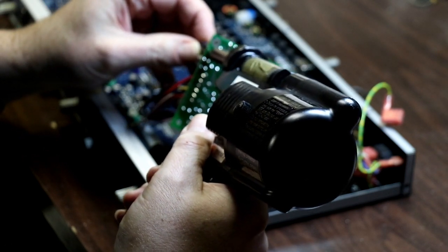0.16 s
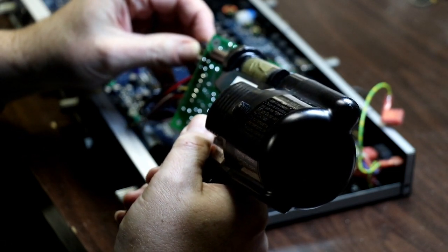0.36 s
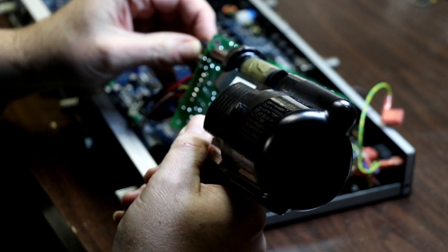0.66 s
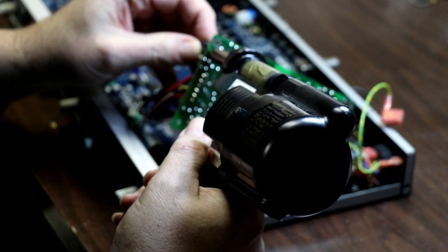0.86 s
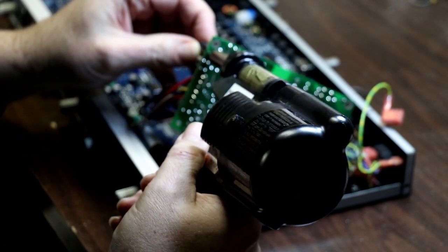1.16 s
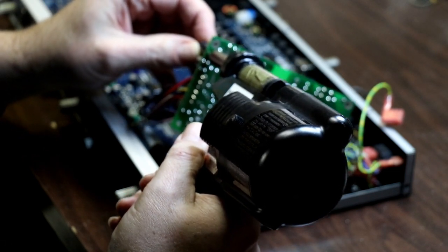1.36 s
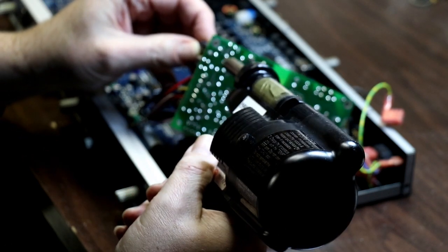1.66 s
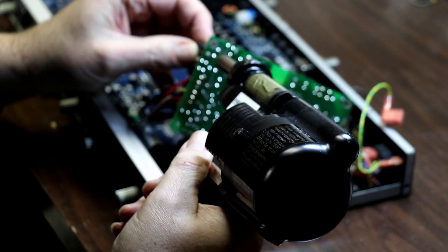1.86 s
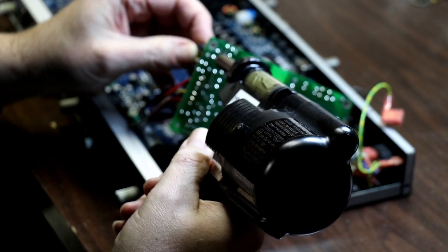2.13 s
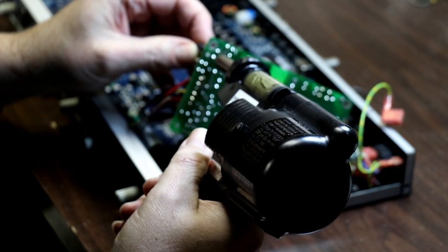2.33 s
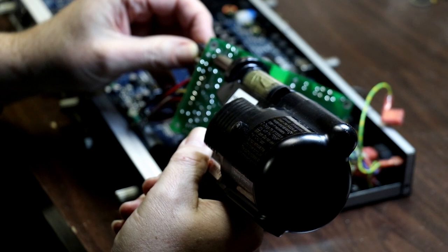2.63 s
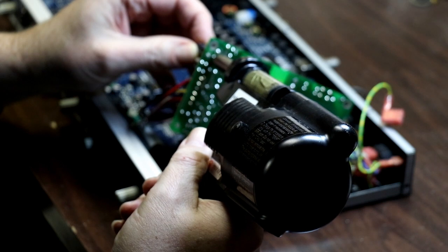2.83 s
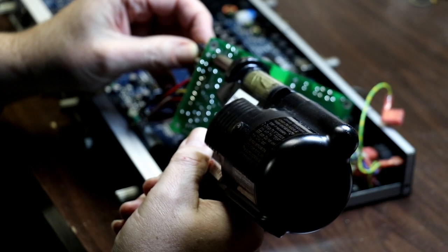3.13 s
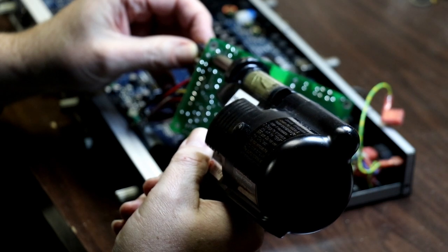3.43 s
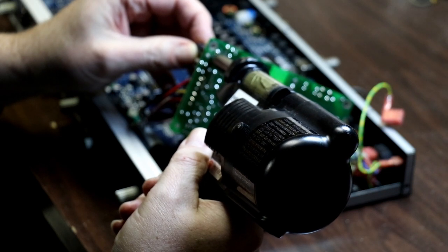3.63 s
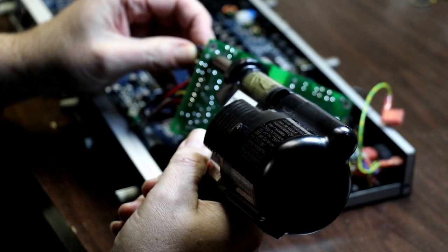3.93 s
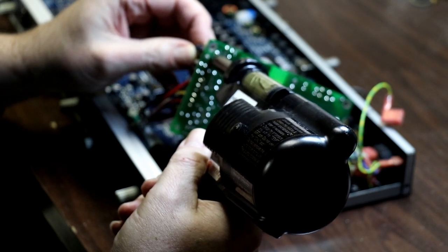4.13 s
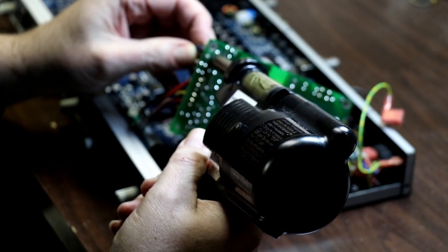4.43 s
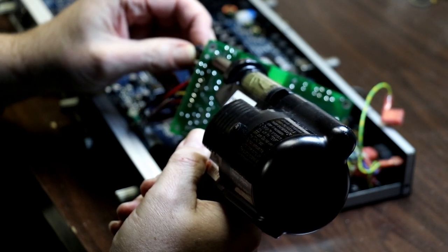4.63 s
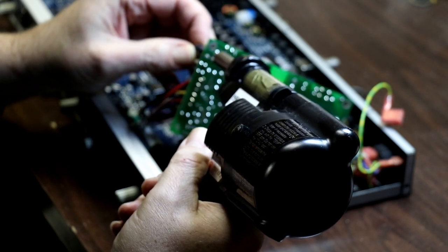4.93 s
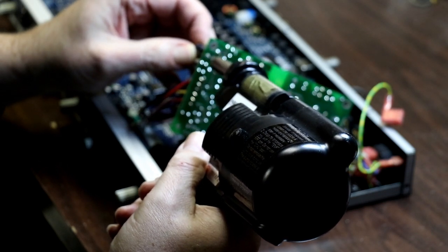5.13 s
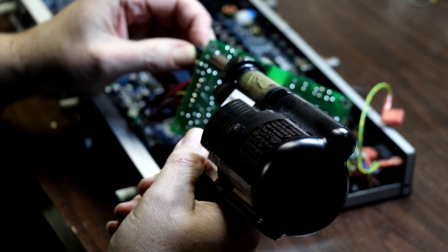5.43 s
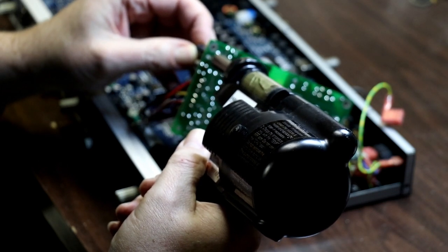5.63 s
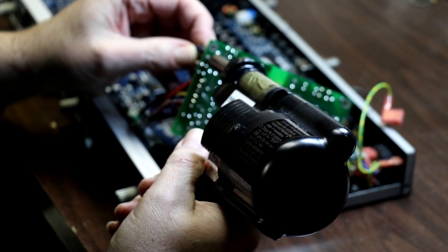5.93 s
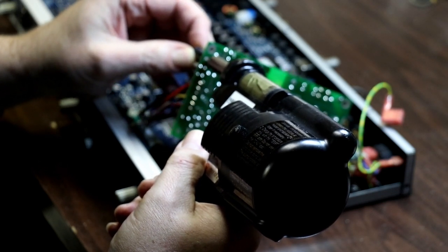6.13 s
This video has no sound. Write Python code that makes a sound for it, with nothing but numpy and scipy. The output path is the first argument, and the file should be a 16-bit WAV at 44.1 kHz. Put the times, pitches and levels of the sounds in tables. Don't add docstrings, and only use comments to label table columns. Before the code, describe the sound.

A small, dry room with a low, soft fan drone and faint hiss throughout, heard in close stereo at a workbench. At about 0.3 s a trigger clicks with a sharp tap and a desoldering gun's motor leaps to speed within a tenth of a second. Its pump makes a loud, coarse, low buzz, roughly a hundred knocks a second, with hard plastic housing resonance, a rattle strongest at the start and bright hissing air in the nozzle. The pitch stays almost steady until 1.5 s, when it drops and dies rapidly. From 1.6 to 3.6 s only the fan is left, with sparse faint ticks of board and tip, one clearer near 2.6 s. At 3.7 s click and tap launch a second buzz, gaining a stronger ringing tone as it runs. It stops at 4.9 s. The fan hum continues to the end around 6.3 s, dipping briefly near 5, 5.9 and 6.1 s.

```python
import sys
import numpy as np
from scipy import signal
from scipy.fft import rfft, irfft, next_fast_len
from scipy.io import wavfile

SR = 44100
rng = np.random.default_rng(int(sys.argv[2]) if len(sys.argv) > 2 else 0)


def int16_out(signal):
    q = np.round(np.clip(np.atleast_2d(signal).T, -1, 1) * 32767)
    wavfile.write(sys.argv[1], SR, q.astype(np.int16))


def voltage_ratio(level):
    return 10 ** (np.asarray(level, float) / 20)


N = 277080
t = np.arange(N) / SR


def rms_one(x):
    return x / np.sqrt(np.mean(x ** 2) + 1e-20)


def at_hz(points, hz, column=1):
    points = np.array(points, float)
    return np.interp(np.log(np.maximum(hz, 1)), np.log(points[:, 0]), points[:, column])


def drift(rate):
    knots = rng.standard_normal(int(N / SR * rate) + 3)
    return np.interp(t * rate, np.arange(len(knots)), knots)


def causal(x, db, size=8192):
    cepstrum = irfft(db * np.log(10) / 20, size)
    cepstrum[1:size // 2] *= 2
    cepstrum[size // 2 + 1:] = 0
    response = irfft(np.exp(rfft(cepstrum)), size)
    return signal.oaconvolve(x, response)[:N]


def resonate(x, hz, width_hz):
    r = np.exp(-np.pi * width_hz / SR)
    zeros = np.array([1, 0, -1]) * (1 - r * r) / 2
    poles = [1, -2 * r * np.cos(2 * np.pi * hz / SR), r * r]
    return signal.lfilter(zeros, poles, x + 1e-18)


def noise(spectrum, likeness):
    size = next_fast_len(N)
    hz = np.arange(size // 2 + 1) * SR / size
    mid, side = rfft(rng.standard_normal((2, size))) * voltage_ratio(at_hz(spectrum, hz))
    alike = np.clip(at_hz(likeness, hz), -1, 1)
    both = np.sqrt(1 + alike) * mid + np.sqrt(1 - alike) * side * [[1], [-1]]
    return rms_one(irfft(both, size)[:, :N])


# time in seconds, depth in dB, half length in seconds.
LULLS = [
    (2.31, -14, 0.027),
    (3.102, -8, .15),
    (5.0, -7, 0.089),
    (5.948, -19, .05),
    (6.095, -13, 0.038),
]
# pitch in Hz, width in Hz, level in dB.
FAN = [(46.6, 1.4, -70), (125, 9.5, -56.5), (194, 15, -51), (231, 3.4, -70), (260, 2.1, -57.5),
       (382, 2.9, -61), (387.7, 12, -56.5), (638, 1.6, -65.5)]
# frequency in Hz, level in dB per Hz.
RUMBLE = [(25, -30), (45, -6), (108, -16), (118, 2), (195, 1), (210, -19), (340, -5), (390, -10),
          (500, -12), (1000, -17.5), (1270, -14.5), (1600, -20), (2500, -26), (3500, -38)]
# frequency in Hz, level in dB per Hz.
SELF_NOISE = [(1470, -24), (2500, -6.5), (3160, -1.5), (4100, -5.5), (4880, -16.5), (5950, -3), (7030, -3),
              (7650, -2.5), (9110, -3.5), (11400, -6.5), (15400, -26)]
# frequency in Hz, left-right likeness (-1 to 1).
ROOM_ALIKE = [(60, 0.89), (130, 0.99), (290, 0.94), (640, 0.63), (1410, 0.36), (3100, -0.04), (6820, -0.01),
              (15000, 0.03)]
BLADE_HZ, BLADE_DB = 192.8, -44.5
RUMBLE_DB, SELF_NOISE_DB = -47.0, -62.5
ROOM_LAG = 5


def room_tone():
    swell = voltage_ratio(sum(db * np.exp(-((t - s) / half_s) ** 2) for s, db, half_s in LULLS))
    blade = np.sqrt(2) * np.sin(2 * np.pi * BLADE_HZ * t + .5 * drift(4.28))
    blade = blade * voltage_ratio(BLADE_DB + 2.0 * drift(5.57))
    tones = sum(voltage_ratio(db) * rms_one(resonate(rng.standard_normal(N), hz, width)) for hz, width, db in FAN)
    rumble = noise(RUMBLE, ROOM_ALIKE)
    rumble[0] = np.roll(rumble[0], ROOM_LAG)
    hiss = noise(SELF_NOISE, ROOM_ALIKE)
    return swell * blade + tones + voltage_ratio(RUMBLE_DB) * rumble + voltage_ratio(SELF_NOISE_DB) * hiss


def room(x, t60_s=0.12):
    age = t[:SR // 2]
    tail = rng.standard_normal((2, len(age))) * voltage_ratio(-60 * age / t60_s) * (age > .004)
    tail = signal.lfilter([.5], [1, -.5], tail)
    tail = tail / np.sqrt(np.sum(tail ** 2) / 2)
    return signal.oaconvolve(x[None], tail, axes=1)[:, :N]


# start in seconds, peak in dB, pitch in Hz.
TICKS = [(1.617, -50.5, 5300), (1.858, -50, 1300), (2.302, -50, 1300), (2.499, -51, 1300),
         (2.562, -41.5, 1200), (3.298, -48, 1900), (3.49, -50, 1300), (3.553, -51, 1300), (3.686, -40, 800),
         (3.69, -38, 2700), (.301, -26, 1500), (3.711, -23, 1500)]


def ticks():
    out = np.zeros(N)
    age = t[:800]
    for s, db, hz in TICKS:
        i = round(s * SR)
        jitter = np.sqrt(hz) / 240 * rng.standard_normal(800).cumsum()
        ring = np.sin(2 * np.pi * hz * age + jitter)
        out[i:i + 800] += voltage_ratio(db + 4) * ring * np.exp(-7 * np.sqrt(hz) * age)
    return out


# start in seconds, peak in dB.
TRIGGER = [
    (0.274, -41),
    (3.682, -41),
]
# (2 / time, in Hz, is
# added to a width of 1000 Hz).
TRIGGER_MODES = [(3400, 0, 0.027), (5660, -8, .02), (6600, -3.5, .03), (8200, -15, .02), (12100, -13, .015)]


def trigger_clicks():
    out = np.zeros(N)
    for s, db in TRIGGER:
        crackle = rng.standard_normal(N) * (t > s) * np.exp(-np.maximum(t - s, 0) / 0.0028)
        modes = sum(voltage_ratio(g) * resonate(crackle, hz, 2.0 / t60 + 1000) for hz, g, t60 in TRIGGER_MODES)
        out += voltage_ratio(db + 22) * modes
    return out


# frequency in Hz, level in dB per Hz.
AIR = [(1940, -3), (3300, 1), (3590, -10.5), (4370, -6), (4610, -3), (5390, -0.5), (6270, 0), (6970, -1.5),
       (7630, 2), (8650, -5), (9600, -1.5), (11500, -7.5), (13100, -15.5), (14500, -11.5), (15800, -26)]
# pitch in Hz, width in Hz, level in dB.
WHISTLES = [(4330, 60, -27.5), (5600, 50, -19), (7470, 79, -37.5), (9370, 48, -17), (10020, 140, -15)]
# frequency in Hz, left-right likeness.
GUN_ALIKE = [(300, .97), (2000, .85), (4400, .8), (8100, .72), (15000, .45)]
BENCH_ECHO = 11


def air(angle):
    hiss = noise(AIR, GUN_ALIKE)
    whistles = sum(voltage_ratio(db + 4.0 * drift(4.68)) * rms_one(resonate(hiss, hz, width))
                   for hz, width, db in WHISTLES)
    spit = .3 * np.exp(60.0 * (np.cos(angle) - 1))
    stroke = 1 + .17 * np.cos(angle - 2.6) + spit
    hiss = rms_one((hiss + whistles) * stroke * voltage_ratio(0.4 * drift(25.03)))
    hiss[0] = .8 * hiss[0] + .45 * np.roll(hiss[0], BENCH_ECHO)
    return hiss * voltage_ratio([[-1.5], [1.5]])


# pitch in
# Hz, width in Hz, level in dB.
SWEPT = [(440, 18, 5), (545, 18, 0), (645, 18, 4), (840, 22, 11), (935, 18, 8), (1235, 20, 7),
         (1325, 20, 6), (1580, 30, 3), (1830, 20, 6), (1920, 20, 6), (2410, 60, 3), (2900, 25, 3)]
# frequency in Hz, level in dB per Hz.
RATTLE = [(60, -24), (150, -3), (400, -1), (700, 4.5), (1000, -9.5), (1300, 2.5), (1600, 0.5), (2000, 2.5),
          (2500, -7.5), (3100, 0.5), (3600, -47), (5000, -19)]


def rattle(angle):
    shaken = noise(RATTLE, GUN_ALIKE) * (1 + .5 * np.cos(angle - .6))
    return shaken + sum(voltage_ratio(db + 10.5) * resonate(shaken, hz, 4 * width) for hz, width, db in SWEPT)


# pitch in Hz, width in Hz, level in dB.
CAGE_MODES = [(913, 120, -9), (1305, 50, 3), (1696, 30, -6), (1915, 190, -9), (2315, 450, -15)]
CAGE_SHARE = 0.19


def cage(angle, lower_db=-8):
    comb = sum(np.exp(1j * k * angle) for k in range(4, 30))
    beat = np.exp(1j * CAGE_SHARE * angle) + voltage_ratio(lower_db) * np.exp(-1j * CAGE_SHARE * angle)
    lines = (comb * beat).real
    return rms_one(sum(voltage_ratio(db) * resonate(lines, hz, width) for hz, width, db in CAGE_MODES))


# multiple of the turn rate, level in dB, left minus right in dB.
HOUSING = [(1, -16, 0), (2, -13, 0), (3, -13, 0), (4, -7, -2), (5, -6, 0), (6, -8, -2), (7, -.5, 5),
           (8, -8, 1), (9, -13, -5), (10, -12, -4), (11, -13, -2), (12, -13.5, 0), (13, -9, -5),
           (14, -4, -1), (15, -21, 2), (16, -9, -4), (17, -20, -4), (18, -10, 0), (19, -17, -8),
           (20, -9, -8), (21, -7, 0), (22, -11, -5), (23, -21, -6), (24, -10, 3), (25, -12, -8),
           (26, -24, -8), (27, -25, -7), (28, -17, -1), (29, -17, -6), (30, -19, -1)]
# frequency in Hz, level in dB, left minus right in dB.
HOUSING_TOP = [(3170, -23.5, 3), (3140, -35, -17), (3460, -34, 13), (3690, -30, -18.5), (4116, -41, -7),
               (4240, -25, 4.5), (4740, -39.5, -21), (5460, -27.5, 6), (6000, -44, -9)]
FULL_HZ, SLEEVE_ORDER, SLOTS = 98.4, 13, 7


def knocks(speed, angle, sleeve_db, wander_db=1.0, slot_db=5.0):
    table = np.array(HOUSING, float) * [FULL_HZ, 1, 1]
    table[SLOTS - 1::SLOTS, 1] -= slot_db
    table = np.vstack([(40, -45, 0), table, HOUSING_TOP])
    turn = np.exp(1j * angle)
    spread = np.exp(1j * np.where(np.arange(61) < 16, 2.2, 1.5) * rng.standard_normal(61))
    force, power = 0, 1
    for k in range(1, 61):
        power = power * turn
        wander = wander_db * min(k / 14, 1.5) * np.array([drift(6.5), drift(4.68)])
        unbalance_db = 34.0 * np.log10(speed / FULL_HZ) * (k < 4)
        extra_db = slot_db * (k % SLOTS == 0) + sleeve_db * (k == SLEEVE_ORDER)
        force = force + (power * spread[k]).real * voltage_ratio(wander + unbalance_db + extra_db)
    hz = np.fft.rfftfreq(8192, 1 / SR)
    swept = sum(db * np.exp(-((hz - centre) / width) ** 2) for centre, width, db in SWEPT)
    level = at_hz(table, hz) + swept
    pan = at_hz(table, hz, column=2)
    return rms_one(np.array([causal(force[0], level + pan / 2), causal(force[1], level - pan / 2)]))


# motor start in seconds, switch opening in seconds, running speed in turns per s,
# creep in turns per s per s.
BURSTS = [
    (0.2755, 1.462, 98.25, 0.08),
    (3.6855, 4.9, 98.3, 0.33),
]
SPIN_UP_S, CRAWL_HZ = .0285, 12
BRAKE_HZ_PER_S, BRAKE_ONSET_S = 400, .025


def shaft():
    speed = np.full(N, float(CRAWL_HZ))
    for start, stop, run_hz, creep in BURSTS:
        age = np.clip(t - start, 0, stop - start)
        late = np.maximum(t - stop, 0)
        driven = (run_hz + creep * age) * (1 - np.exp(-age / SPIN_UP_S))
        braking_s = late - BRAKE_ONSET_S * (1 - np.exp(-late / BRAKE_ONSET_S))
        speed = np.maximum(speed, driven - BRAKE_HZ_PER_S * braking_s)
    speed = speed * (1 + .0006 * drift(30))
    return speed, 2 * np.pi * np.cumsum(speed) / SR


# seating after the start in seconds, hiss gained by the end in dB.
SETTLING = [
    (.17, 2),
    (0.16, 1.5),
]
# level at the start in dB, level at the end in dB.
SLEEVE = [
    (-3, -6),
    (-9, 7),
]
KNOCK_DB, KNOCK_DB_PER_DECADE, KNOCK_SURGE_DB, KNOCK_FADE_DB_PER_S = -14, 53, 0.5, 276
AIR_DB, AIR_DB_PER_DECADE, AIR_SURGE_DB, AIR_FADE_DB_PER_S = -32.5, 15, 3.0, 205
RATTLE_SEATED_DB, RATTLE_LOOSE_DB, RATTLE_STOP_DB = -19, -10, -5.5
SEAT_BLUR_S, FADE_DELAY_S, LOOSEN_S = 0.014, 0.004, 0.024
BITE_S, UNLOADED_DB = .024, -9


def effort():
    out = np.full((4, N), -110.)
    for (start, stop, *_), (seat_s, air_gain_db), (sleeve_from_db, sleeve_to_db) in zip(BURSTS, SETTLING, SLEEVE):
        age = np.maximum(t - start, 1e-5)
        late = np.maximum(t - stop - FADE_DELAY_S, 0)
        rise = np.log10(1 - np.exp(-age / SPIN_UP_S))
        held = np.clip(age / (stop - start), 0, 1)
        loose = .5 - .5 * np.tanh((age - seat_s) / SEAT_BLUR_S)
        freed = np.clip((t - stop) / LOOSEN_S, 0, 1)
        slack_db = UNLOADED_DB * (age < BITE_S)
        knock = KNOCK_DB + KNOCK_DB_PER_DECADE * rise + KNOCK_SURGE_DB * loose
        knock = knock + slack_db - KNOCK_FADE_DB_PER_S * late
        hiss = AIR_DB + AIR_DB_PER_DECADE * rise + AIR_SURGE_DB * loose
        hiss = hiss + .5 * slack_db + air_gain_db * held - AIR_FADE_DB_PER_S * late
        sleeve = sleeve_from_db + (sleeve_to_db - sleeve_from_db) * held
        shake = RATTLE_SEATED_DB + (RATTLE_LOOSE_DB - RATTLE_SEATED_DB) * loose
        shake = shake + (RATTLE_STOP_DB - RATTLE_SEATED_DB) * freed
        out = np.where(t > start, [knock, hiss, sleeve, shake], out)
    return out


def pump():
    speed, angle = shaft()
    knock_db, air_db, sleeve_db, rattle_db = effort()
    body = knocks(speed, angle, sleeve_db)
    body = body + voltage_ratio(-21.5) * cage(angle) * voltage_ratio([[-2], [2]])
    body = body + voltage_ratio(rattle_db - 21.5) * rattle(angle)
    body[0] = np.roll(body[0], 1)
    return voltage_ratio(knock_db) * body + voltage_ratio(air_db) * air(angle)


def scene():
    clicks = trigger_clicks() + ticks()
    gun = pump() + clicks * voltage_ratio([[-1], [1]])
    wet_db = -27
    return gun + voltage_ratio(wet_db) * room(gun.mean(0)) + room_tone()


def band_limit(x):
    return signal.sosfilt(signal.butter(12, 16000, fs=SR, output="sos"), x)


def record(dry):
    low_pass = signal.cheby2(14, 60, 16050, fs=SR, output="sos")
    mix = signal.sosfilt(low_pass, dry)
    return band_limit(mix)


dry = scene()
out = record(dry)
int16_out(out)
```